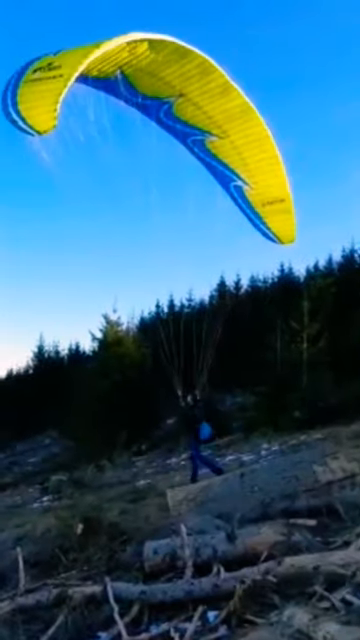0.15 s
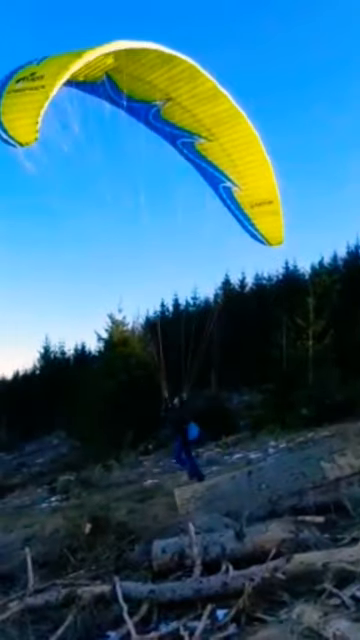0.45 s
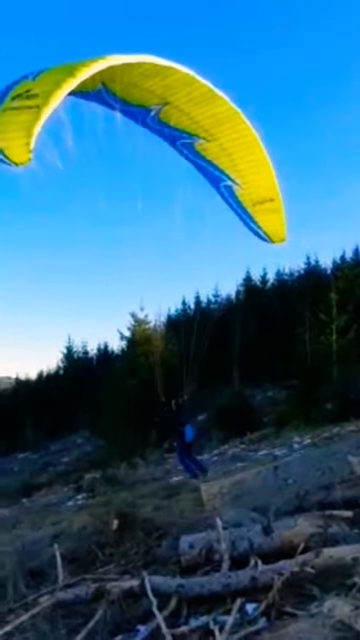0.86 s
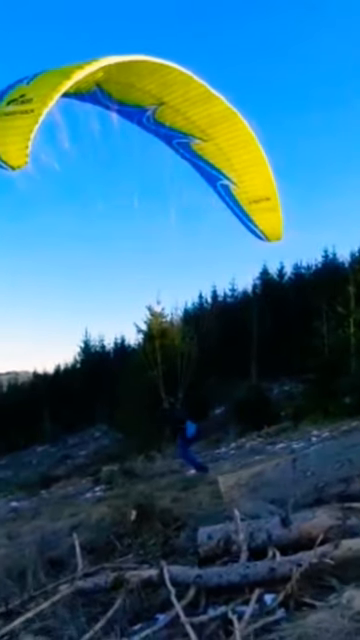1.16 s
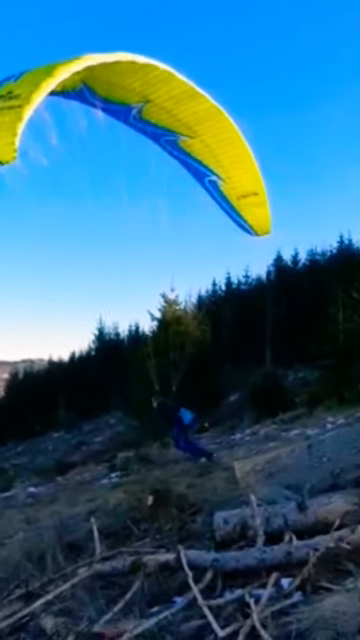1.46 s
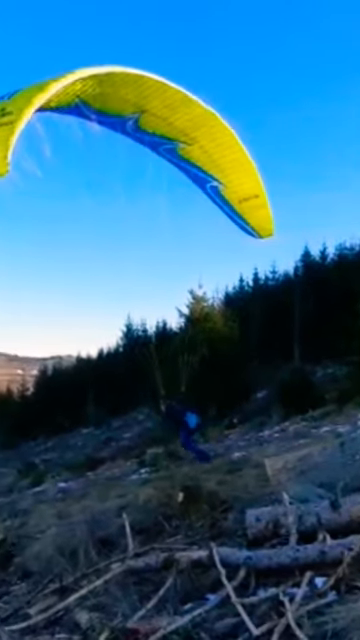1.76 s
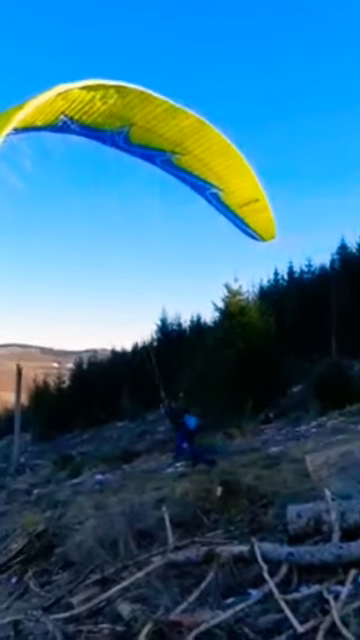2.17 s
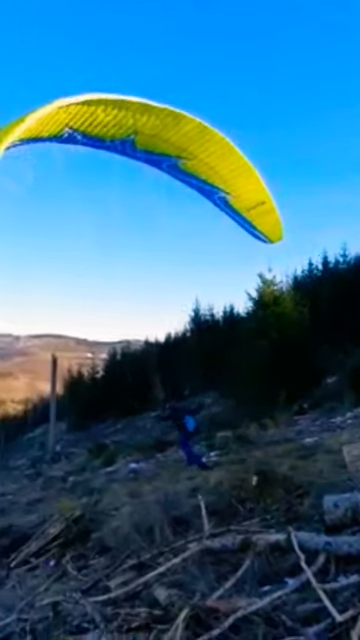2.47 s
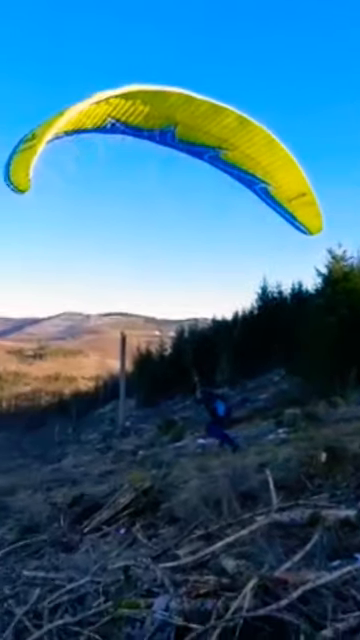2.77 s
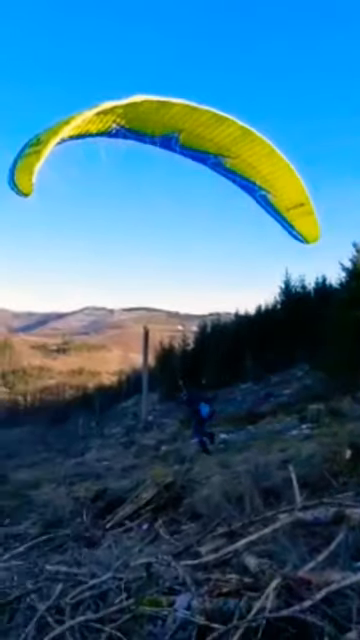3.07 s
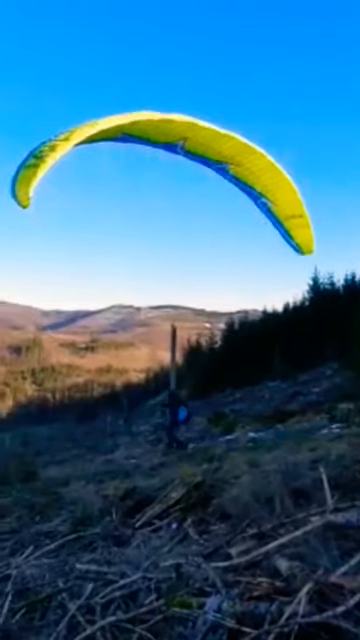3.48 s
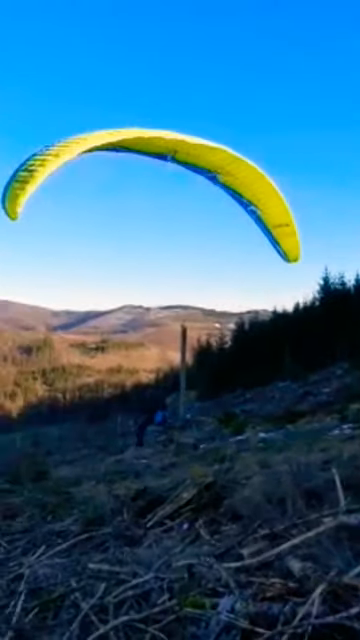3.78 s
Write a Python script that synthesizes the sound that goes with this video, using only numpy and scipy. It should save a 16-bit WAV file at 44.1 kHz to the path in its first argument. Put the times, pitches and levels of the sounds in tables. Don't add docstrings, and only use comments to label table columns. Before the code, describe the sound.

Low gusty wind thuds against both microphone ports outdoors, shifting between left and right. Behind it, a runner launching a paraglider makes quiet fabric and brush rustles with tiny snaps, clearer once the wind eases near the end.

```python
import sys
import numpy as np
from scipy import signal
from scipy.fft import rfft, irfft
from scipy.io import wavfile
from scipy.ndimage import uniform_filter1d

SR = 44100
rng = np.random.default_rng(int(sys.argv[2]) if len(sys.argv) > 2 else 0)


def volts(x):
    e = np.asarray(x, float) / 20
    return 10 ** e


def store_pcm(level_fs):
    pcm = np.round(np.clip(level_fs, -1, 1) * 32767).astype(np.int16)
    wavfile.write(sys.argv[1], SR, np.atleast_2d(pcm).T)


N = 173754


def evened(x):
    return x / np.sqrt(np.mean(abs(x) ** 2) + 1e-20)


def read(points, hz):
    f, value = np.transpose(points)
    return np.interp(np.log(hz + 1), np.log(f + 1), value)


def add(mix, s, sound):
    at = round(s * SR)
    part = mix[max(at, 0):][:len(sound) + min(at, 0)]
    part += sound[max(-at, 0):][:len(part)]


def bells(rows, t):
    return sum(volts(2 * db) * np.exp(-np.log(16) * ((t - s) / length) ** 2) for s, length, db in rows)


def blurred(shape, frames, bins):
    z = rng.standard_normal(shape[::-1]).T
    z = uniform_filter1d(z, max(int(bins), 1), 0)
    return evened(uniform_filter1d(z, max(int(frames), 1), 1))


def noise_pair(magnitude, same, size):
    a, b, c, d = rng.standard_normal(magnitude.shape[:0:-1] + (4,)).T
    same = np.clip(same, -1, 1)[:, None]
    left = a + 1j * b
    right = same * left + np.sqrt(1 - same ** 2) * (c + 1j * d)
    z = np.array([left, right]) * magnitude
    return signal.istft(z, nperseg=size, noverlap=size * 3 // 4)[1][:, :N]


def wander(per_s):
    hz = np.fft.rfftfreq(N, 1 / SR)
    return evened(irfft(rfft(rng.standard_normal(N)) * np.exp(-(hz / per_s) ** 2), N))


def steady_hiss(hz, t):
    # frequency in Hz, level in dB per Hz.
    hiss_colour = [(290, -55), (500, -1.5), (997, -9.5), (1350, -5.5), (1720, -12.5), (5130, -21.5),
                   (7450, -29), (13000, -26), (15500, -29)]
    # centre in seconds, length in seconds.
    lulls = [(0.96, 0.075), (1.367, 0.06), (2.006, 0.072)]
    colour = volts(read(hiss_colour, hz)) ** 2 * np.minimum(hz / 500, 1) ** 4
    colour = colour / colour[hz > 700].sum() * volts(2 * -71.5)
    dip_db = -2 * bells([(s, length, 0) for s, length in lulls], t)
    return np.outer(colour, volts(dip_db) ** 2)


def whistling_rubs(hz, t):
    # centre in seconds, length in seconds, level in dB, pitch in Hz.
    rubs = [(0.294, 0.18, -75.5, 3200), (0.34, 0.083, -75.5, 2100), (1.185, 0.1, -72, 2080),
            (1.205, 0.062, -68.5, 2930), (2.828, 0.072, -66.5, 1560), (2.92, 0.12, -65.5, 814),
            (2.976, 0.073, -70, 1440), (3.534, 0.12, -70, 1500), (3.362, 0.043, -80, 2000),
            (3.58, 0.04, -74, 2250)]
    width_hz = 300
    power = 0
    for s, length, db, rub_hz in rubs:
        colour = 1 / (1 + (2 * (hz - rub_hz) / width_hz) ** 2) ** 2
        power = power + np.outer(colour / colour.sum(), bells([(s, length, db)], t))
    return power


def webbing_scrapes(hz, t, low_cut, band):
    # frequency in Hz, level in dB per Hz.
    webbing_colour = [(530, 0), (900, 6.5), (1120, -7), (1910, -8), (2120, -1), (2660, -12.5), (3000, -4.5),
                      (6420, -17), (15500, -37)]
    # centre in seconds, length in seconds, level in dB.
    scrapes = [(.1, 0.33, -77), (.3, 0.17, -75), (1.09, 0.29, -77), (1.2, 0.15, -72.5), (1.9, 0.062, -73.5)]
    colour = volts(read(webbing_colour, hz)) ** 2 * low_cut
    return np.outer(colour / colour[band].sum(), bells(scrapes, t))


def nylon_swishes(hz, t, low_cut, band):
    # frequency in Hz, level in dB per Hz.
    nylon_colour = [(530, -4), (900, -3), (1290, -1.5), (2570, -3.5), (3180, -1.5), (5180, -3),
                    (7590, -11.5), (8440, -9.5), (15500, -21.5)]
    # centre in seconds, length in seconds, level in dB, tilt in dB per octave.
    swishes = [(0.563, 0.071, -65.5, 1.5), (0.686, 0.07, -66, 2), (0.803, 0.1, -70.5, 0),
               (1.507, 0.048, -68.5, 5.5), (1.58, 0.068, -72, 3.5), (1.67, 0.061, -74, 0.5),
               (1.833, 0.063, -74.5, 3.5), (2.22, 0.1, -80, 10), (2.331, 0.062, -66.5, 1.5),
               (2.385, 0.091, -69, -2.2), (2.474, 0.06, -77, 12), (2.566, 0.13, -72, 0.5),
               (2.824, 0.12, -74, -6), (2.9, 0.19, -72.5, 3), (2.997, 0.17, -70, -1.8),
               (3.258, 0.013, -81, 11), (3.365, 0.15, -68.5, -2.3), (3.55, 0.12, -70.5, -1),
               (3.79, 0.32, -70.5, -2.5), (3.91, 0.036, -76, 8.5)]
    power = 0
    for s, length, db, tilt_db in swishes:
        octaves = np.log2(hz / 4500 + 0.0078)
        colour = volts(2 * read(nylon_colour, hz) + 2 * tilt_db * octaves) * low_cut
        power = power + np.outer(colour / colour[band].sum(), bells([(s, length, db)], t))
    return power


def rustle():
    # frequency in Hz, left minus right in dB.
    lean_points = [(60, 1), (180, -2), (550, -2), (1650, 4.5), (4970, 13), (15000, 3)]
    # frequency in Hz, likeness from 0 to 1.
    likeness = [(500, 0.51), (1400, 0.39), (2400, 0.27), (4400, 0.14), (8000, 0.046)]
    hz, frames = np.fft.rfftfreq(512, 1 / SR), N // 128 + 5
    t = np.arange(frames) * 128 / SR
    low_cut = np.minimum(hz / 900, 1) ** 4
    band = (hz > 2500) & (hz < 7000)
    runner = webbing_scrapes(hz, t, low_cut, band) + nylon_swishes(hz, t, low_cut, band)
    runner = runner + whistling_rubs(hz, t)
    grain_db = 1 * blurred(runner.shape, frames=1.5, bins=170)
    crinkle_db = 2 * blurred(runner.shape, frames=12.5, bins=5.5)
    lean = volts(np.array([[1], [-1]]) * read(lean_points, hz))[:, :, None]
    power = runner * lean ** 0.94 + steady_hiss(hz, t) * lean ** 0.98
    field = np.sqrt(power) * volts(grain_db + crinkle_db)
    plain = np.ones((2, len(hz), frames)) / np.sqrt(len(hz))
    scale = np.std(noise_pair(plain, 0 * hz, size=512))
    return noise_pair(field, read(likeness, hz), size=512) / scale


def snaps():
    # time in seconds, peak in dB, pitch in Hz, width in Hz (wider fades faster).
    clicks = [(.381, -52, 3200, 200), (.381, -54, 2120, 150), (.394, -54, 3160, 150),
              (.394, -60.5, 5000, 3000), (1.284, -57, 4000, 2500), (2.113, -63, 2190, 350),
              (2.123, -56, 2180, 350), (2.333, -58, 2000, 2500), (.003, -43.5, 3980, 12000),
              (2.1, -44.5, 950, 300), (2.539, -56, 10800, 5130), (2.541, -51, 9400, 5000),
              (2.562, -57, 8000, 3000), (2.616, -58, 6960, 5000), (2.916, -56, 9000, 3000),
              (3.305, -47.5, 2760, 4000), (3.887, -51, 9700, 3000)]
    out, t = np.zeros((2, N)), np.arange(1500) / SR
    for s, db, hz, width in clicks:
        burst = rng.standard_normal((2, 300)) * np.exp(-((t[:300] - .003) * 650) ** 2)
        ring = np.exp(-np.pi * width * t) * np.sin(2 * np.pi * hz * t)
        for side, lean_db in enumerate((4, -4)):
            sound = np.convolve(burst[side], ring)
            add(out[side], s - .003, volts(db + lean_db) * sound / abs(sound).max())
    return out


def buffeting():
    # frequency in Hz, level in dB per Hz.
    wind_colour = [(12, -60), (20, -13.5), (54, -3.5), (76, -3.5), (176, -11), (326, -15), (437, -18.5),
                   (670, -33.5), (1200, -50), (1560, -78), (2640, -120)]
    # centre in seconds, length in seconds, level in dB.
    gusts_left = [(0.0, 0.18, -40), (0.35, 0.21, -38.5), (0.7, 0.18, -41.5), (0.85, 0.23, -41),
                  (1.29, 0.15, -36.5), (1.52, 0.022, -37.5), (1.71, 0.091, -41), (1.86, 0.099, -35),
                  (2.13, 0.14, -39), (2.36, 0.036, -38), (2.46, 0.041, -41), (2.62, 0.11, -40),
                  (2.82, 0.064, -39.5), (2.98, 0.093, -39), (3.11, 0.027, -39), (3.3, 0.18, -52),
                  (3.52, 0.047, -49.5), (3.77, 0.2, -45.5)]
    gusts_right = [(0.0, 0.035, -33), (0.22, 0.035, -32.5), (0.41, 0.31, -44), (0.74, 0.22, -42),
                   (0.91, 0.02, -29), (1.3, 0.11, -34.5), (1.8, 0.17, -36.5), (2.05, 0.027, -39.5),
                   (2.19, 0.11, -41), (2.36, 0.036, -32), (2.47, 0.032, -46), (2.63, 0.15, -43.5),
                   (2.83, 0.059, -39.5), (2.96, 0.13, -43.5), (3.11, 0.039, -42.5), (3.38, 0.46, -54.5),
                   (3.75, 0.18, -47), (3.94, 0.021, -44)]
    hz, frames, t = np.fft.rfftfreq(2048, 1 / SR), N // 512 + 5, np.arange(N) / SR
    patches = np.array([blurred((len(hz), frames), frames=2.5, bins=6.5) for _ in range(2)])
    colour = volts(read(wind_colour, hz)[:, None] + 1.5 * patches) * (hz < 1500)[:, None]
    bed = evened(noise_pair(colour, 0 * hz, size=2048))
    bed = evened(bed * volts(3.5 * wander(45)))
    low_pass = signal.butter(2, 198, fs=SR, output="sos")
    rumble = signal.sosfiltfilt(low_pass, bed)
    roar = bed - rumble

    calm = volts([[-57.5], [-55]])
    gust = np.sqrt(calm ** 2 + np.array([bells(gusts_left, t), bells(gusts_right, t)]))
    strongest = gust.max()
    swell = gust / strongest
    rumble_level = volts([[-4], [-1.5]]) * strongest * swell ** np.array([[0.54], [1]])
    roar_level = volts([[-3.5], [-4]]) * strongest * swell ** np.array([[1], [0.7]])
    return rumble_level * rumble + roar_level * roar


def eddies(rows, cycles, trim_db):
    out, chance = np.zeros((2, N)), rng.random((len(rows), 2))
    for (s, db, heading, hz), (phase, slide) in zip(rows, chance):
        u = np.arange(-2 * cycles / hz, 2 * cycles / hz, 1 / SR) * hz
        swing = np.cos(2 * np.pi * (u + .3 * (slide - .5) * u ** 2 + phase))
        swing *= volts(db + trim_db) * np.exp(-np.log(16) * (u / cycles) ** 2)
        add(out[0], s + u[0] / hz, np.cos(np.radians(heading)) * swing)
        add(out[1], s + u[0] / hz, np.sin(np.radians(heading)) * swing)
    return out


def flutters():
    # time in seconds, peak in dB, heading in degrees (as for the thumps), pitch in Hz.
    small_eddies = [(0.008, -39, -9, 274), (0.235, -34.5, 90, 410), (0.284, -33.5, -65, 285),
                    (0.36, -43, 32, 270), (0.43, -42, 81, 334), (0.624, -36.5, 41, 288),
                    (0.682, -34.6, 5, 271), (0.717, -34, 32, 293), (0.749, -35, -27, 273),
                    (0.828, -38, -87, 282), (0.841, -39.3, 70, 270), (0.881, -33.5, -22, 324),
                    (0.908, -33.5, -8, 279), (1.246, -33.5, 62, 265), (1.286, -39, 79, 260),
                    (1.307, -31, 46, 383), (1.327, -38.3, 44, 282), (1.341, -39.5, -80, 266),
                    (1.741, -37, 75, 293), (1.809, -37, -33, 273), (1.882, -37.5, 86, 344),
                    (1.902, -32.5, -84.5, 290), (2.062, -37.5, 40, 301), (2.171, -36, -95, 260),
                    (2.344, -38.2, -66, 306), (2.367, -32, -51, 258), (2.466, -33.5, 24.5, 316),
                    (2.603, -32, 30, 338), (2.803, -38, 15, 323), (2.851, -35.5, -80, 276),
                    (3.002, -40.0, 82, 390), (3.645, -37, 84, 304), (3.737, -42.5, -86, 288)]
    return eddies(small_eddies, cycles=2.14, trim_db=1.3)


def thumps():
    big_eddies = [(0.009, -24, 16), (0.059, -29.5, 15), (0.201, -31, 6), (0.268, -29.5, 0),
                  (0.295, -40, -7), (0.338, -29, -24), (0.398, -33, -7), (0.506, -28.5, 41),
                  (0.649, -27.5, 33), (0.705, -31, 41), (0.753, -22.7, -29), (0.817, -25, 58),
                  (0.897, -25.6, -39), (0.914, -26.0, -41), (1.198, -31.5, 46), (1.252, -21.5, 25),
                  (1.296, -27.9, 39), (1.349, -26.5, 41), (1.386, -24.5, -38), (1.411, -31, -34),
                  (1.668, -23.5, -48), (1.71, -31.5, 39), (1.736, -28, -46), (1.809, -25, -37),
                  (1.832, -27, -37), (1.897, -24.5, 20), (1.928, -27.5, 58), (2.053, -32, 30),
                  (2.146, -28.5, 27), (2.182, -28.3, 45), (2.237, -31.5, 29), (2.304, -33.5, 29),
                  (2.353, -26, -32), (2.561, -33.5, 37), (2.658, -36.5, 45), (2.799, -36, 53),
                  (2.836, -29.5, 38), (2.923, -30, -33), (3.015, -30.5, 5), (3.106, -23, -30),
                  (3.299, -33.5, 38), (3.383, -34, 58), (3.41, -35.4, 77), (3.514, -37.1, 40),
                  (3.641, -36, 47), (3.743, -28, -12), (3.817, -30, -74), (3.929, -35, 40)]
    pitches = 68.8 * (0.83 + 0.39 * rng.random(len(big_eddies)))
    rows = [(*row, hz) for row, hz in zip(big_eddies, pitches)]
    return eddies(rows, cycles=1, trim_db=2.5)


def wind_on_ports():
    port_band = signal.butter(3, [37.2, 590], "band", fs=SR, output="sos")
    return buffeting() + signal.sosfiltfilt(port_band, thumps() + flutters())


def scene():
    return rustle() + snaps() + wind_on_ports()


def band_limit(x):
    return signal.sosfilt(signal.butter(12, 15680, fs=SR, output="sos"), x)


def record(dry):
    return band_limit(dry)


dry = scene()
out = record(dry)
store_pcm(out)
```